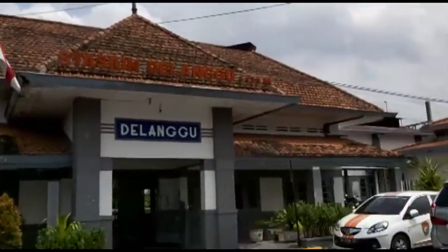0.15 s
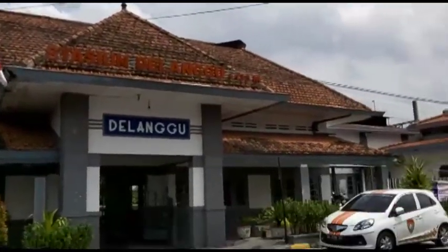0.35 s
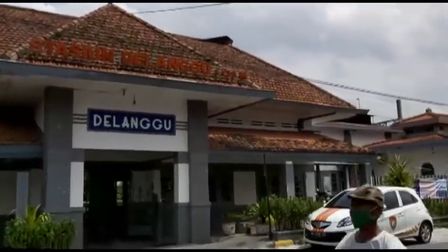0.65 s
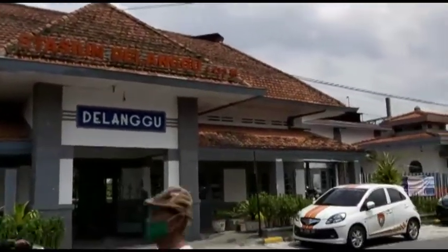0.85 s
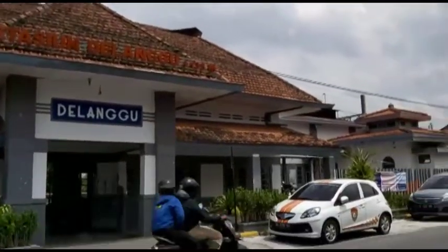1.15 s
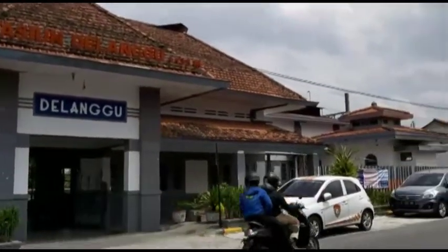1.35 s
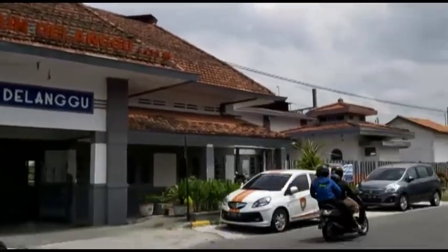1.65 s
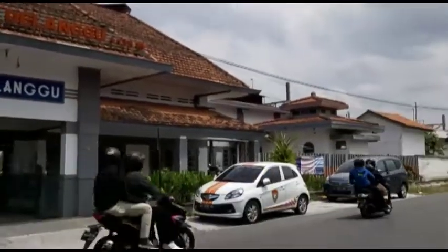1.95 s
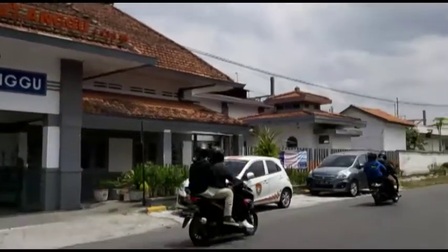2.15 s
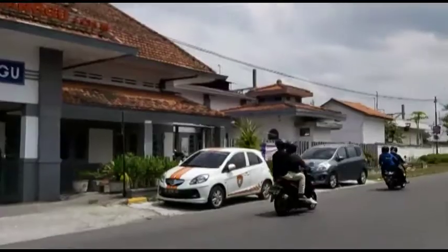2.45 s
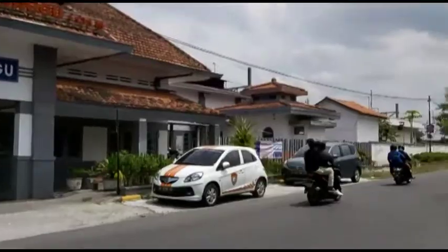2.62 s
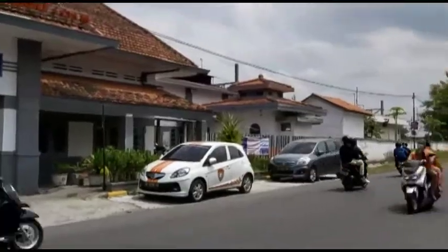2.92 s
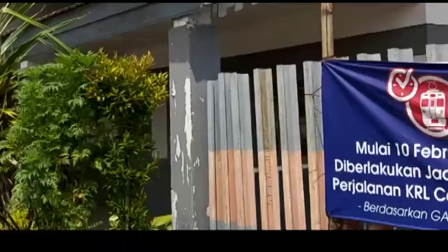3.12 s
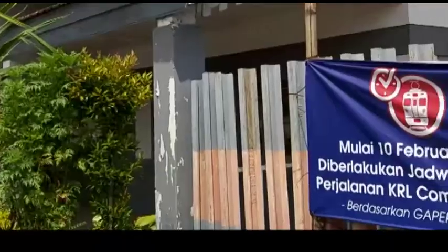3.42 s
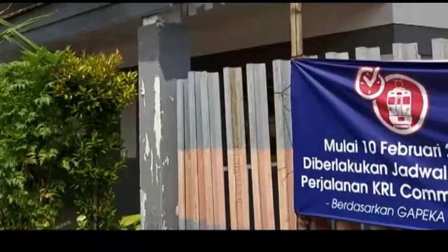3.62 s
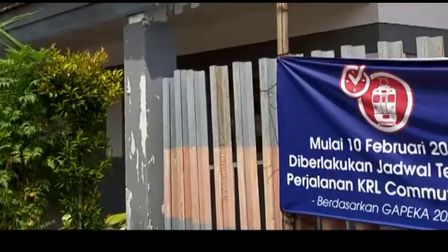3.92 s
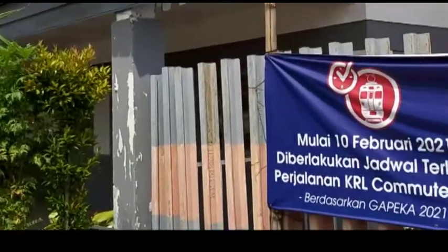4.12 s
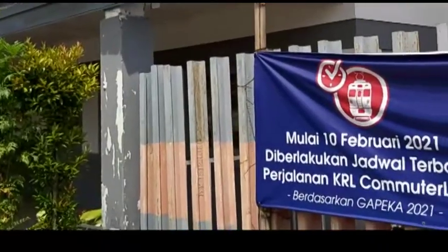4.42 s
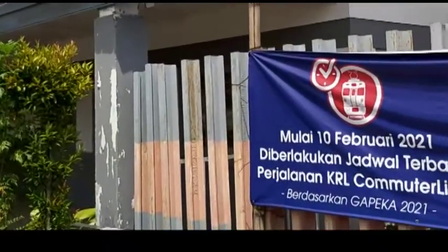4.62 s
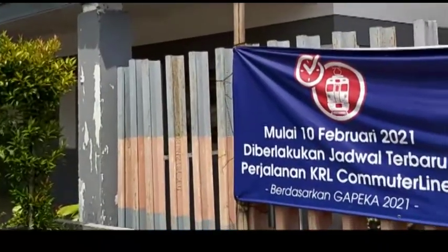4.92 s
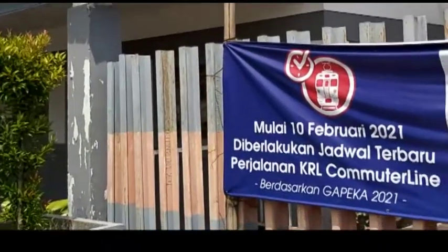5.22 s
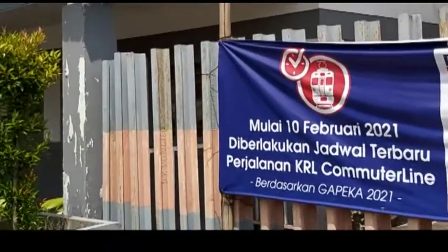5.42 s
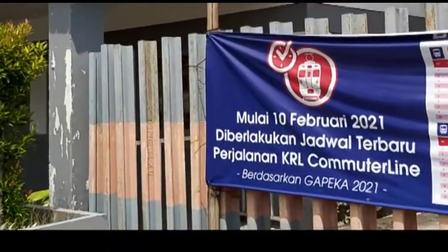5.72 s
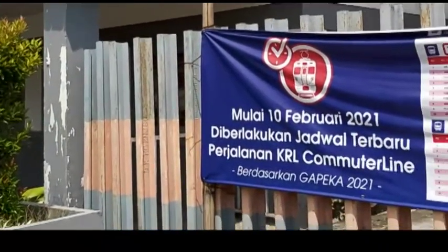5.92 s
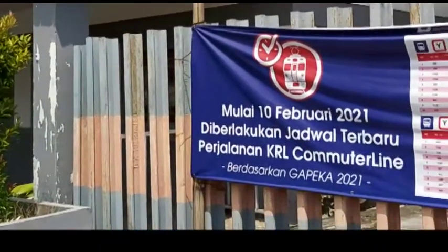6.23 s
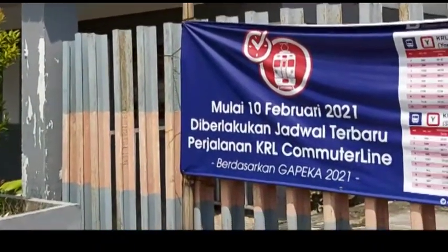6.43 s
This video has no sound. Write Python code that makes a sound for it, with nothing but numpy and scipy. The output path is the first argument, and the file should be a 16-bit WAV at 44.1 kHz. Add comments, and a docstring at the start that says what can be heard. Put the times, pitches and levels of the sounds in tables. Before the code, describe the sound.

Small scooters buzz past close by on a roaring street, then an abrupt cut to a big engine idling low over dull distant traffic.

```python
"""Scooters ride past close by on a street: exhaust drones made of firing harmonics, over roar of shaped noise.
Filtered noise makes casing clatter and ticks, short falling tones make brake squeaks, blurred tones whine.
Then a cut to a quieter spot: a big engine idles nearby over dull, distant traffic and another draws near.
Two spaced microphone ports pick it up; most of it arrives at the left port first."""
import sys
import numpy as np
from scipy import signal
from scipy.fft import rfft, irfft, next_fast_len
from scipy.io import wavfile

SR = 44100
rng = np.random.default_rng(int(sys.argv[2]) if len(sys.argv) > 2 else 0)


def decibels_to_gain(level_db):
    """Convert a level in decibels to a linear amplitude gain (20 dB per decade)."""
    exponent = np.asarray(level_db, float) / 20
    return 10 ** exponent


def master_out(mix):
    """Clip the mix to full scale and print it as 16-bit PCM to the path in sys.argv[1]."""
    frames = np.transpose(np.atleast_2d(mix))
    ceiling = np.clip(frames, -1, 1)
    pcm = np.round(ceiling * 32767).astype(np.int16)
    wavfile.write(sys.argv[1], SR, pcm)


N = 289737

CUT_S = 3.0715   # change of place, from the street to the quieter spot
# second scooter, heard by its exhaust and its clatter: speed [t/s, f/cycles per s], exhaust [t/s, level/dB]
CLATTERING_SCOOTER = ([(1.0, 45.0), (1.4, 44.8), (1.7, 44.3), (2.0, 43.7), (2.6, 43.5), (3.07, 43.2)],
                      [(.9, -30), (1.2, -26), (1.6, -23.5), (2.1, -21), (2.5, -26), (2.8, -25),
                      (3.07, -30)])


def rms_one(x):
    """Scale to rms 1."""
    return x / np.sqrt(np.mean(x ** 2) + 1e-20)


def in_time(rows):
    """Columns of a curve at every sample."""
    s, *columns = np.transpose(rows)
    return [np.interp(np.arange(N) / SR, s, c) for c in columns]


def at_hz(points, hz, order=1):
    """One column of a table over log frequency."""
    points = np.array(points)
    return np.interp(np.log(hz), np.log(points[:, 0]), points[:, order])


def drift(rate_hz):
    """Slow chance of spread 1: noise at every 40th sample through a double one-pole."""
    r = np.exp(-2 * np.pi * rate_hz * 40 / SR)
    white = rng.standard_normal(N // 40 + 1002)
    slow = signal.lfilter([1], [1, -2 * r, r * r], white)[1000:]
    return np.interp(np.arange(N) / 40, np.arange(len(slow)), rms_one(slow))


def noise_blur(white, width_hz):
    """Low-pass complex noise so that, carried on a tone, it makes a band of the given width."""
    return signal.sosfilt(signal.butter(2, width_hz / 2, fs=SR, output="sos"), white)


def resonate(x, hz, width_hz):
    """Two-pole resonance, gain 1 on top."""
    r = np.exp(-np.pi * width_hz / SR)
    top_gain = (1 - r * r) / 2
    return signal.lfilter(np.array([1, 0, -1]) * top_gain,
                          [1, -2 * r * np.cos(2 * np.pi * hz / SR), r * r], x)


def ports(x, lead_ms, pan_db):
    """A single source reaches the left port first; pan_db is left over right."""
    late = np.interp(np.arange(N) - lead_ms * SR / 1000, np.arange(N), x)
    return np.array([x * decibels_to_gain(pan_db / 2), late * decibels_to_gain(-pan_db / 2)])


def cycles(run):
    """Crank cycles counted since the start, and the exhaust gain faded at both ends of the run."""
    speed, level = run
    t = np.arange(N) / SR
    since_start = t - level[0][0] + .03
    until_end = level[-1][0] + .03 - t
    fade = np.clip(np.minimum(since_start, until_end) / .05, 0, 1)
    return np.cumsum(in_time(speed)[0]) / SR, fade * decibels_to_gain(in_time(level)[0])


def exhaust(run, note, waver_db, waver_rad, waver_hz, first=0):
    """Each firing is a pressure dip: multiples of the cycle, wavering as firings and echoes vary."""
    throb_db, throb_hz = 1.2, 18   # firings differ in strength
    count, gain = cycles(run)
    out = 0
    for k, db in note:
        smear = rng.uniform(0, 2 * np.pi) * (k > 4)   # the pipe scatters the timing of the upper multiples
        phase = 2 * np.pi * k * (count - first) + smear + waver_rad * drift(waver_hz)
        out = out - decibels_to_gain(db + waver_db * drift(waver_hz)) * np.cos(phase)
    return gain * rms_one(out * decibels_to_gain(throb_db * drift(throb_hz)))


def scooters():
    """Four small engines pass close to the ports, each a run of speed and level with its own exhaust note."""
    # other scooters' runs: speed [t/s, f/cycles per s], exhaust [t/s, level/dB]
    run_1, run_3, run_4 = ([(0, 43.4), (.25, 43.1), (.5, 42.2), (.75, 42.3), (.95, 43.5)], [(0, -25),
                           (.25, -24), (.6, -21.5), (.8, -26), (.95, -32)]), ([(1.6, 36.1), (2.0, 35.6), (2.3, 34.8), (2.6, 34.7),
                                              (3.07, 34.3)], [(1.55, -34), (2.0, -33), (2.4, -28),
                                              (2.7, -27), (3.07, -23.5)]), ([(.6, 40.0), (1.1, 39.6), (1.4, 40.4),
                                                                 (1.7, 40.3), (2.0, 41.1), (2.3, 41.1),
                                                                 (2.6, 40.5), (3.07, 39.9)], [(.6, -28),
                                                                 (.75, -23), (1.1, -24), (1.45, -20),
                                                                 (1.75, -25), (2.05, -23), (2.4, -29),
                                                                 (3.07, -32)])
    # exhaust notes: [multiple of the cycle, relative level/dB]
    note_1, note_2 = [(2, 1), (3, -5.5), (4, -0.5), (5, -7.5), (6, -10.5), (7, -7.5), (8, -2.5)], [(2, -6.5), (4, -5.5), (5, -4), (6, -3.5), (7, -0.5), (8, 0), (9, -1),
                                      (10, -8), (11, -13.5), (13, -15)]
    note_3, note_4 = [(2, -1.5), (3, -8), (4, -2.5), (6, -15.5), (7, -9.5)], [(2, -2.5), (3, -5), (4, 1), (6, -4.5), (7, -5), (8, -8)]
    out = ports(exhaust(run_1, note_1, 2.0, 0.53, 2.0), lead_ms=0.085, pan_db=-1.5)
    out += ports(exhaust(CLATTERING_SCOOTER, note_2, 2.0, .6, 3.0), lead_ms=.12, pan_db=-2.5)
    out += ports(exhaust(run_3, note_3, 1.79, 0.65, 1.5), lead_ms=0.09, pan_db=1.5)
    out += ports(exhaust(run_4, note_4, 2.5, .5, 2.4), lead_ms=0.14, pan_db=-2.0)
    return out


def clatter():
    """Valve and chain noise puffs once a cycle and rings in the casing, a band around a moving centre."""
    # casing clatter, its colour shifting as the scooter turns: [t/s, level/dB, resonance f/Hz]
    casing = [(1.45, -47.5, 7500), (1.56, -39, 7400), (1.68, -42.5, 7400), (1.79, -38.5, 7400),
              (1.95, -47.5, 7570), (2.15, -46.5, 7680), (2.33, -42, 7830), (2.47, -45.5, 7250),
              (2.68, -43, 7500), (2.8, -41.5, 7590), (3.07, -47, 7700)]
    width_hz, wander_hz = 600, 80
    count, _ = cycles(CLATTERING_SCOOTER)
    level_db, hz = in_time(casing)
    a, b = rng.standard_normal((2, 2, N))
    puff_shape = .6 + np.exp(-4.0 * (count % 1))
    puffs = (a + 1j * b) * puff_shape * decibels_to_gain(1.0 * drift(12))
    carrier = np.exp(2j * np.pi * np.cumsum(hz + wander_hz * drift(5.4)) / SR)
    rung = noise_blur(puffs, width_hz) * carrier
    fade_in = np.clip((np.arange(N) / SR - 1.2) / .3, 0, 1)
    return rms_one(rung.real) * decibels_to_gain(level_db) * fade_in


def ticks():
    """Short bursts of noise around the pitch of a loose part."""
    # loose parts ticking: [t/s, level/dB of the burst before it is narrowed by its resonance]
    taps = [(0.7302, -21), (0.9057, -19.5), (0.972, -21.5), (1.0698, -19.5), (1.2141, -21), (1.287, -22),
            (1.3578, -22)]
    centre_hz, spread, width_hz, decay_s = 7400, 0.21, 5800, 0.0047   # spread in log pitch
    out, size = np.zeros((2, N)), 600
    pitches = centre_hz * np.exp(spread * rng.standard_normal(len(taps)))
    decay = np.exp(-np.arange(size) / (decay_s * SR))
    for (s, db), hz, burst in zip(taps, pitches, rng.standard_normal((len(taps), 2, size))):
        at = round(s * SR)
        out[:, at:at + size] += decibels_to_gain(db) * resonate(burst * decay, hz, width_hz)
    return out


def squeaks():
    """A brake pad slips for a few ms on a high, slightly falling tone."""
    # brake squeaks and one lower chirp: [centre t/s, peak level/dB, f/Hz, length/s]
    slips = [(.514, -24, 11600, .006), (0.779, -17, 11930, .012), (.7945, -25.5, 12110, .007),
             (.829, -24, 2860, .012)]
    out, t = np.zeros(N), np.arange(N) / SR
    for s, db, hz, length in slips:
        shape = np.cos(np.pi * np.clip((t - s) / length, -.5, .5))
        out += decibels_to_gain(db) * shape * np.sin(2 * np.pi * hz * (t - s) * (1 - .8 * (t - s)))
    return out


def swells():
    """Whines, strays and ringing bodywork: rows (centre t/s, length/s, f/Hz, width/Hz, level/dB, pan/dB)."""
    # whines as gears, belts and tyres go by: [centre t/s, length/s, f/Hz, level/dB, left-right/dB]
    known = [(0.36, 0.38, 2900, -40.5, -10), (0.74, 0.44, 1960, -37, -2), (0.68, 0.45, 3730, -42.5, -6),
             (0.872, 0.4, 952, -32, -1.5), (0.902, 0.36, 2210, -38, 5.5), (1.42, 0.14, 1540, -32.5, -5),
             (1.496, 0.49, 1882, -33.5, -2.5), (1.636, 0.3, 2250, -35.5, -1), (1.82, 0.33, 2170, -33.5, 3),
             (1.97, 0.15, 1850, -36, 2), (1.797, 0.8, 695, -36, -1.5), (1.9, 1.1, 822, -35, -1.5),
             (2.38, 0.32, 2045, -33, 0.5), (2.65, 0.32, 2024, -35, -1), (2.753, 0.72, 773, -33.5, -3),
             (3.298, 0.45, 309.4, -44.5, -4), (3.57, 0.4, 441, -43.5, -0.5), (4.15, 0.7, 1880, -59, -0.5),
             (4.5, 1.0, 169, -45, 1.5), (4.35, 0.39, 500, -46, 4.5)]
    # bodywork rings up as a scooter goes by: [centre t/s, length/s, level/dB, left-right/dB]
    passes = [(0.882, 0.5, -41.5, 4.5), (1.429, .25, -43, 3.5), (1.85, .45, -38.5, 7.5),
              (2.168, 0.33, -41.5, -0.5)]
    # what the bodywork rings with: [f/Hz, width/Hz, relative level/dB]
    body = [(2250, 450, 1.5), (2826, 300, -1.5), (3576, 248.5, -3.5), (4325, 420, 1.5), (12060, 1300, -11)]
    least_width_hz, width_share = 20, .03   # a whine's width grows with this share of its pitch
    # fainter strays, anywhere before the cut
    stray_count, stray_db, stray_s, (low_hz, high_hz) = 5, -42, .35, (1600, 2500)
    stray = [(stray_s + a * (CUT_S - 2 * stray_s), stray_s, low_hz * (high_hz / low_hz) ** b, stray_db, 6 * c - 4)
             for a, b, c in rng.random((stray_count, 3))]
    rows = [(s, length, hz, least_width_hz + width_share * hz, db, pan)
            for s, length, hz, db, pan in known + stray]
    ringing = [(s, length, hz, width, db + own, pan)
               for s, length, db, pan in passes for hz, width, own in body]
    return rows + ringing


def whines(fall=0.019):
    """Each whine is a tone blurred by noise to its width; passing motion lets the pitch sink."""
    roughness_db, roughness_hz = 2.5, 35   # random roughness of level, shared by all whines
    out, roughness = np.zeros((2, N)), decibels_to_gain(roughness_db * drift(roughness_hz))
    for s, length, hz, width_hz, db, pan_db in swells():
        span = slice(round((s - length / 2) * SR), min(round((s + length / 2) * SR), N))
        t = np.arange(span.start, span.stop) / SR - s
        white = rng.standard_normal((2, 3, len(t) + 4000))
        blur = noise_blur(white[0] + 1j * white[1], width_hz)[:, 4000:]
        blur = 0.58 * blur[0] + blur[1:]   # the ports share a part
        blur = blur / np.std(blur) + 10 / width_hz   # the narrower, the steadier
        tone = (blur * np.exp(2j * np.pi * hz * t * (1 - fall * t / 2))).real
        gain = decibels_to_gain(db + pan_db * np.array([[.5], [-.5]]))
        out[:, span] += gain * rms_one(tone * roughness[span]) * np.cos(np.pi * t / length)
    return out


def idling_engine():
    """A big engine nearby fires at a steady slow idle and swells twice."""
    # exhaust of the idling engine: [t/s, level/dB]
    level = [(3.07, -28), (3.8, -23), (4.4, -26.5), (5.15, -23), (5.7, -27), (6.57, -30)]
    # its note: [multiple of the cycle, relative level/dB]
    note = [(2, 1), (3, -2), (4, -10.5), (5, -6.5), (7, -12.5), (8, -15.5), (9, -7.5)]
    idle_per_s, first = 8.27, .906   # cycles per s, and where in the cycle it fires
    sound = exhaust(([(0, idle_per_s)], level), note, 1.2, 0.15, 0.94, first=first)
    return ports(sound, lead_ms=1.6, pan_db=-1.5)


def nearing_engine():
    """Another engine draws near: its exhaust note, a late boom and a thin whine, all on one crank."""
    # speed [t/s, f/cycles per s], exhaust [t/s, level/dB]
    run = ([(5.7, 46.7), (6.0, 46.4), (6.3, 46.3)], [(5.8, -54), (6.0, -47), (6.6, -45)])
    # its note: [multiple of the cycle, relative level/dB]
    note = [(6, -9), (10, 0), (12, -2), (20, -13)]
    # 4th multiple, booming in late: [t/s, level/dB]
    boom = [(6.16, -52), (6.24, -42), (6.6, -42)]
    # thin whine on the 22nd multiple, first a blip, then held: [t/s, level/dB]
    thin_whine = [(5.84, -52), (5.89, -46), (5.95, -64), (6.28, -68), (6.34, -49), (6.6, -47.5)]
    speed = run[0]
    sound = exhaust(run, note, 2.5, .8, 6.0)
    sound = sound + exhaust((speed, boom), [(4, 0)], 1.0, .4, 4.0)
    sound = sound + exhaust((speed, thin_whine), [(22, 0)], 1.0, .4, 4.0)
    return ports(sound, lead_ms=.3, pan_db=-.7)


def traffic(levels, colour, port, layer_hz, span, patchy_db):
    """Many vehicles blur into noise: half-octave bands that swell with their layer and flicker on their own."""
    size = next_fast_len(span.stop - span.start)
    hz = np.arange(size // 2 + 1) * SR / size + 1e-3
    shared, left, right = rfft(rng.standard_normal((3, size)))
    alike = np.clip(at_hz(port, hz), 0, 1)
    late = np.exp(-2j * np.pi * hz * at_hz(port, hz, order=2) / 1000)
    pan = decibels_to_gain(at_hz(port, hz, order=3) / 2)
    left_port = pan * (np.sqrt(alike) * shared + np.sqrt(1 - alike) * left)
    right_port = (np.sqrt(alike) * shared * late + np.sqrt(1 - alike) * right) / pan
    pair = np.array([left_port, right_port]) * decibels_to_gain(at_hz(colour, hz))
    level = np.array(in_time(levels))[:, span]
    swell = level - level.mean(axis=1, keepdims=True)
    out, together = 0, drift(21)[span]
    for centre in np.arange(3, 14.1, .5):   # log2 of Hz
        band = np.clip(1 - 2 * np.abs(np.log2(hz) - centre), 0, 1)   # triangles that add up to 1
        mix = [np.interp(centre, np.log2(layer_hz), row) for row in np.eye(3)]
        gain_db = mix @ swell + patchy_db * (.5 * together + drift(2.45)[span])
        out = out + decibels_to_gain(gain_db) * irfft(pair * band, size)[:, :swell.shape[1]]
    full = np.zeros((2, N))
    full[:, span] = decibels_to_gain(level[0].mean()) * rms_one(out)   # the lowest layer's mean sets the whole level
    return full


def near_traffic():
    """Close street bed: rumble, tyre roar and hiss, each layer with its own swell."""
    # layer curves: [t/s, rumble level/dB, tyre roar level/dB, hiss level/dB], the last two for their swell only
    layers = [(0, -16.5, -30.5, -42), (0.7, -16.5, -28.5, -35), (1.15, -14, -29, -36),
              (1.75, -22, -28, -35), (2.25, -20, -26, -38), (3.07, -22, -28, -39.5)]
    # colour of the street: [f/Hz, relative level/dB per Hz]
    colour = [(8.8, -60), (15, -33), (24, -27.5), (43, -14), (56, -13.5), (74, -4), (163, -6.5), (194, -7),
              (300, -2.5), (569, -12), (1050, -13), (2110, -16), (5350, -30.5), (12100, -34.5),
              (15700, -40.5)]
    # what the ports hear: [f/Hz, left-right likeness 0-1, left lead/ms, left-right/dB]
    spacing = [(40.2, 0.8, 0.19, -12), (157, 1, 0.27, 1.5), (348, 0.64, 0.1096, -3.5), (702, 0.52, 0.15, 0),
               (1225, 0.46, 0.45, -1.5), (3060, 0.32, .47, 1.3), (9000, 0, 0.504, -2.5)]
    span = slice(0, round(CUT_S * SR) + 200)
    return traffic(layers, colour, spacing, layer_hz=(200, 1400, 8000), span=span, patchy_db=1.0) * decibels_to_gain(-2.0)


def far_levels():
    """Each band settles after the cut; near the end lows and highs rise while the middle slips a little."""
    settled_db, excess_db, settle_s = (-33.5, -44.5, -55), (4, 4, 7.5), 0.8
    return_s, return_db_per_s = 6.03, (1, -0.3, 5)   # as the other engine nears
    s = np.linspace(CUT_S, N / SR, 30)[:, None]
    db = settled_db + np.exp((CUT_S - s) / settle_s) * excess_db
    db = db + np.maximum(s - return_s, 0) * return_db_per_s
    return np.hstack([s, db])


def far_traffic():
    """Distant vehicles as dull noise with little treble, loosely alike at the two ports."""
    # colour at a distance: [f/Hz, relative level/dB per Hz]
    colour = [(5.9, -37.5), (10, -2.5), (23, -4), (42, -6), (56, -7.5), (257, -23), (481, -24.5),
              (878, -32.5), (1830, -38.5), (2250, -46), (2780, -46), (3800, -58), (4810, -59.5),
              (5200, -78.5), (6760, -110), (11400, -120)]
    # what the ports hear: [f/Hz, left-right likeness 0-1, left lead/ms, left-right/dB]
    spacing = [(30, 0.6, 1.1, -1), (110, 0.7, 0.32, -1.5), (249, 0.23, 1.8, -1.5), (500, 0.1, 1.76, -4.5),
               (1300, 0.17, 1.74, -0.3), (3500, 0.04, 1.8, -3)]
    span = slice(round(CUT_S * SR) - 200, N)
    return traffic(far_levels(), colour, spacing, layer_hz=(80, 450, 2200), span=span, patchy_db=1.0) * decibels_to_gain(4.0)


def scene():
    """Near street up to the cut, quiet spot after it."""
    near = scooters() + clatter() + ticks()
    near += ports(squeaks(), lead_ms=.314, pan_db=-4.0)
    near += near_traffic()
    far = idling_engine() + nearing_engine() + far_traffic()
    splice = np.clip((np.arange(N) - round(CUT_S * SR)) / 100 + .5, 0, 1)
    return near * (1 - splice) + far * splice + whines()


def roll_off(x):
    """The treble ends steeply here."""
    return signal.sosfilt(signal.butter(12, 15840, fs=SR, output="sos"), x)


def record(dry):
    """Peaks are rounded by a soft limit, then the top is cut."""
    rounded = 1.257 * np.tanh(dry / 1.13)
    top_cut = signal.ellip(8, .2, 60, 15900, fs=SR, output="sos")
    return roll_off(signal.sosfilt(top_cut, rounded))


dry = scene()
out = record(dry)
master_out(out)
```